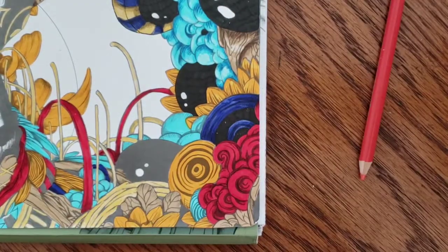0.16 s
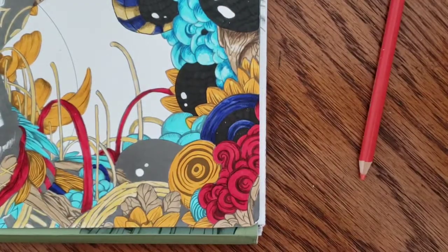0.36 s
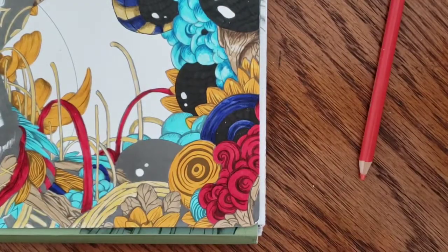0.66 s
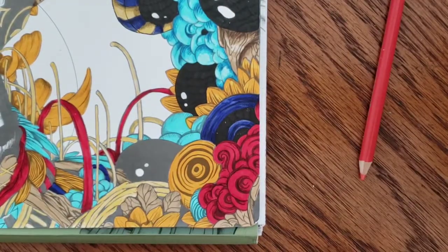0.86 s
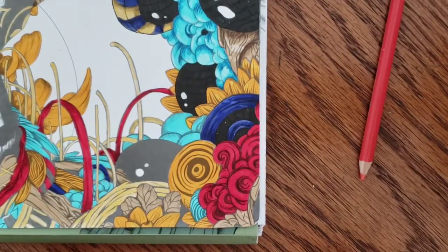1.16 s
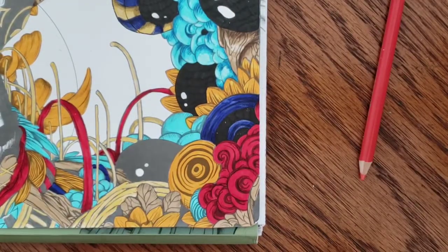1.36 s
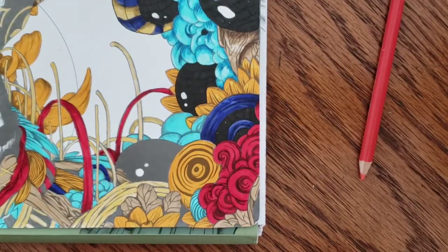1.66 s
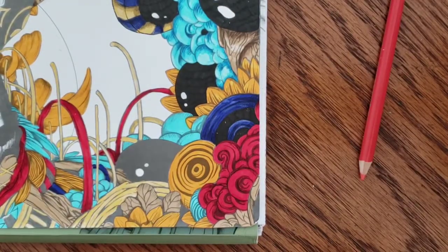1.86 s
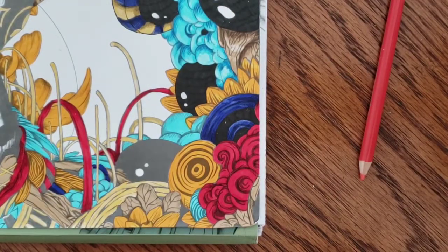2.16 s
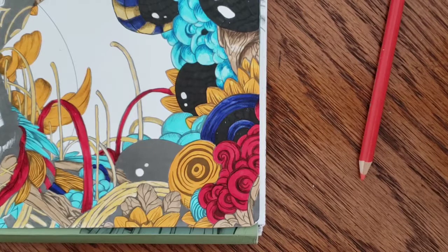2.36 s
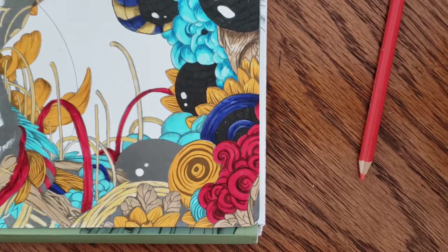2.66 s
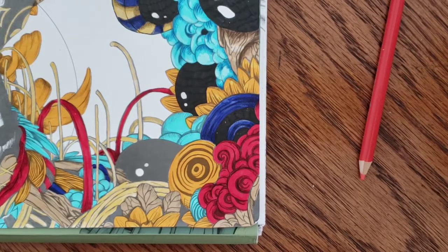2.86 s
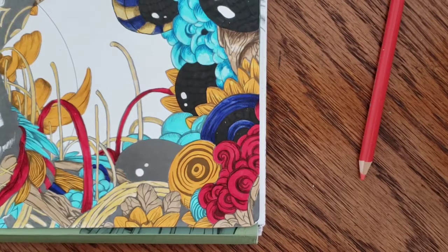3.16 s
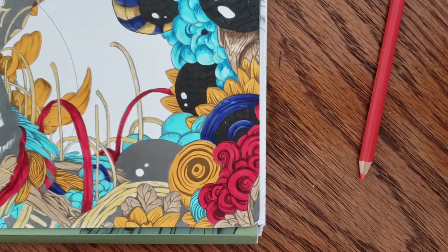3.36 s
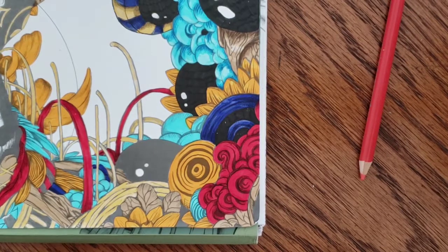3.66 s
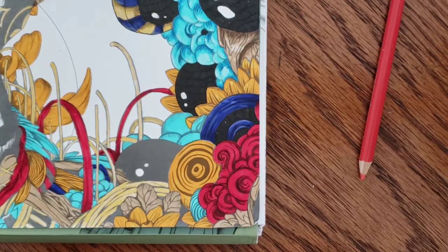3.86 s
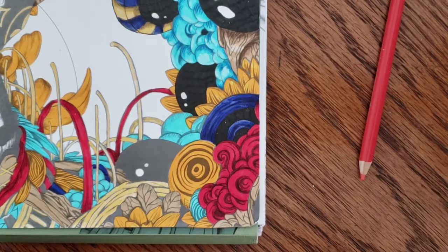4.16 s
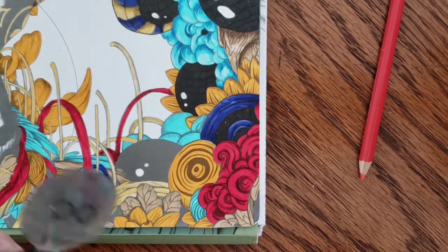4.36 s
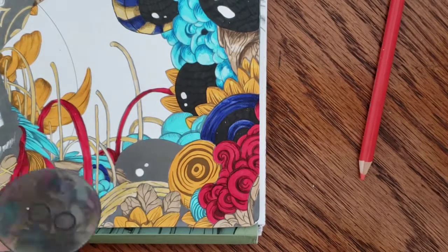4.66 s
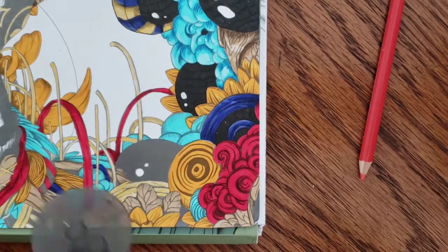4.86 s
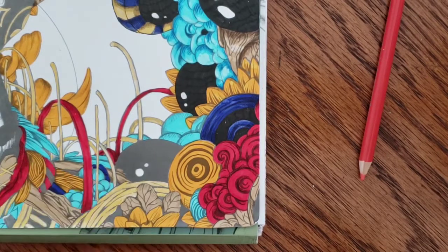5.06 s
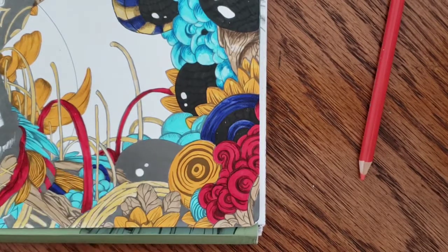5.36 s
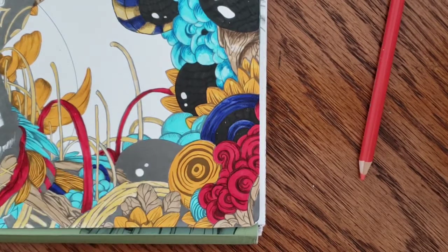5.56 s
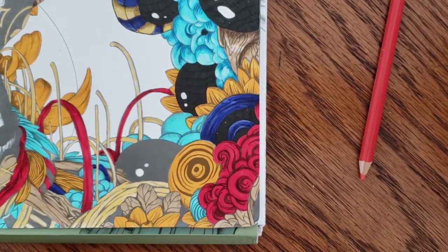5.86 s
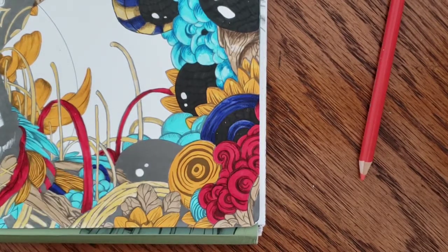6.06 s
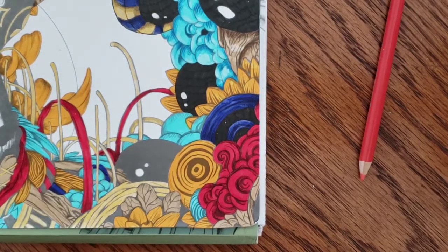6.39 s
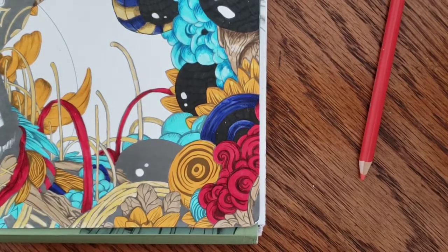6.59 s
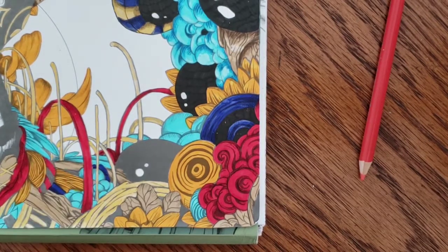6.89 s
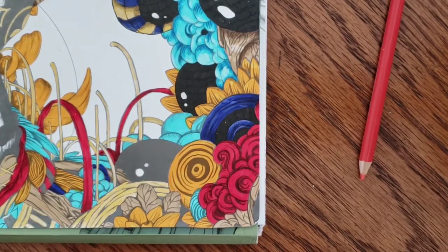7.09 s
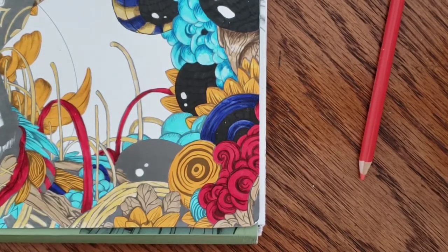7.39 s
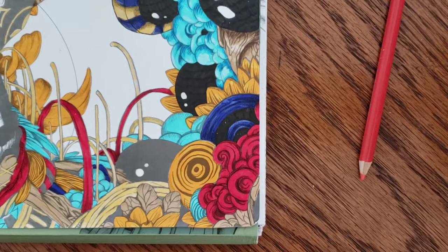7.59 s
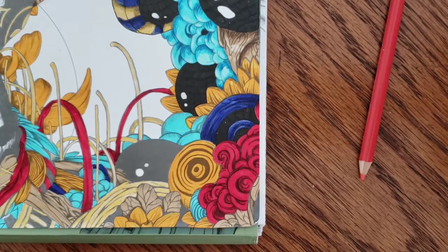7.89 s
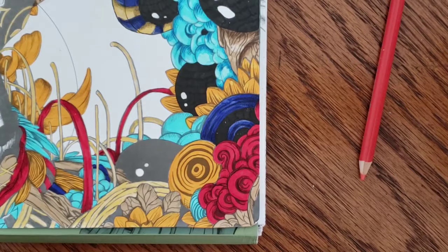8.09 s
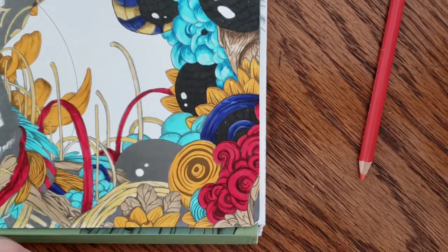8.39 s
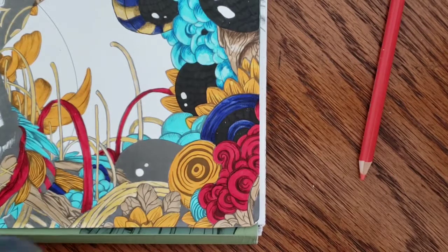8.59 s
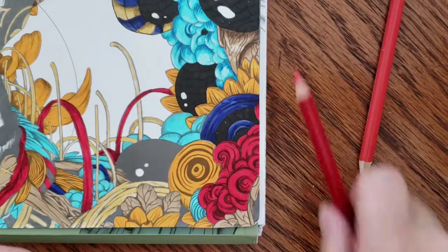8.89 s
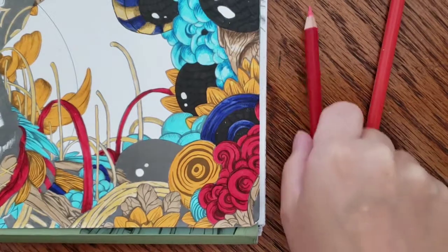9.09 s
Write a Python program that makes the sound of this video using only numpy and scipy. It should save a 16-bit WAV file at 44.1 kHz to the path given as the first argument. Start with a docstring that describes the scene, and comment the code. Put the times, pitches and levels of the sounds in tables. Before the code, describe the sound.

A pencil twists in a small hand sharpener with crisp, crackling wood scrapes in two bouts, between light knocks on a wooden desk.

```python
"""At a wooden desk in a small, quiet room, a pencil is twisted in a hand sharpener, in two bouts of twists.
It is a little right of the microphone. Tearing fibres and snapping flakes are short bursts of noise,
heard directly and through the ringing housing. In between, pencil and sharpener knock on the desk and slide.
A draught is low noise in gusts, different at the two microphone ports.
Behind it lie room air, a fan singing near 1 kHz and faint hums."""
import sys
import numpy as np
from scipy import signal
from scipy.fft import rfft, irfft, next_fast_len
from scipy.io import wavfile
from scipy.ndimage import map_coordinates

SR = 44100
rng = np.random.default_rng(int(sys.argv[2]) if len(sys.argv) > 2 else 0)


def generate_wav(signal):
    """Clip the signal to [-1, 1] and save it as 16-bit WAV at the path in sys.argv[1]."""
    frames = np.transpose(np.atleast_2d(signal))
    scaled = np.clip(frames, -1, 1) * 32767
    pcm = np.round(scaled).astype(np.int16)
    wavfile.write(sys.argv[1], SR, pcm)


N = 407484

# All levels in the tables are relative: the functions may raise or lower a whole layer.
# twists of the pencil, each with its own grip: start_s, length_s, hardest_push_place (0 to 1),
# level_db, left_minus_right_db, housing_ring_db, brightness_db
TWISTS = [(0.649, 0.088, 0.6, -65.5, 2, -27, 2.5), (0.999, 0.16, .8, -55, -1.5, -18, -1),
          (1.156, 0.097, 0.2, -46, -2, -18, -1.5), (1.548, 0.023, .5, -55, -1, -14, 2),
          (1.623, .13, 0.34, -48, -4.5, -11.5, -1.5), (2.089, 0.021, .2, -55.5, -2.5, -13, -1.5),
          (2.22, .17, 0.4, -49.5, -1, -13.5, -1.5), (2.714, 0.067, 0.04, -52.5, -1, -15, 0),
          (2.843, 0.17, 0.3, -52, 0.5, -18, 0), (3.066, 0.023, .2, -50.5, -2, -17, 2),
          (3.471, 0.14, 0.3, -58.5, -1, -18.5, -0.5), (3.742, 0.071, 0.5, -59, -4, -16, -3),
          (3.88, 0.13, 0, -66.5, -4, -13, -0.5), (5.594, 0.15, .6, -51, -1, -13, 3),
          (5.729, 0.13, .35, -44.5, 0, -10.5, -5), (6.261, 0.043, .4, -63.5, -1, -21.5, 3.5),
          (6.404, 0.17, 0.64, -52, -.5, -12.5, -3.5), (6.595, 0.13, 0, -54.5, -.5, -13, -3),
          (7.213, 0.12, 0.05, -65.5, 0.5, -8, -0.5), (7.423, 0.41, 0.81, -51, -.5, -15.5, -3),
          (7.903, 0.19, 0.88, -56, -1, -17.5, -4)]
# the pencil rubs in the cone between twists: start_s, length_s, level_db
RUBS = [(0.296, 0.48, -79.5), (.95, 0.46, -74.5), (1.602, 0.28, -71.5), (2.19, 0.23, -70),
        (3.4, 0.6, -75.5), (5.5, 0.45, -72), (6.225, 0.58, -72), (7.046, 1, -77), (8.228, 0.038, -72)]
# the larger flakes that snap off: start_s, level_db
FLAKE_SNAPS = [(.905, -64), (1.056, -43), (1.1293, -38), (1.1628, -35), (1.216, -41), (1.5414, -43),
               (1.6342, -48), (1.669, -33), (2.083, -40), (2.2223, -48), (2.257, -43), (2.7601, -41),
               (2.807, -41.5), (2.865, -38.5), (2.8956, -36.5), (2.9427, -41), (3.0026, -49), (3.0693, -39),
               (3.4895, -46), (3.5086, -38.5), (3.5748, -34.5), (5.7718, -31), (5.7944, -32), (5.8703, -42),
               (6.2523, -48.5), (6.2706, -45.5), (6.4093, -44), (6.5214, -34.5), (6.6688, -37.5),
               (6.6757, -37.5), (7.2744, -54), (7.344, -50), (7.3847, -47.5), (7.4647, -45), (7.538, -41.5),
               (7.836, -48), (8.0563, -33.5)]
# tone colour of tearing wood: frequency_hz, level_db
TEAR_COLOUR = [(300, -16.5), (1300, -4), (2000, -21), (3800, -20.5), (4600, -9), (6600, -1), (8300, 2),
               (10400, 3), (11800, 4), (13000, 4.5), (14500, 2)]
# resonances of the sharpener housing: pitch_hz, width_hz, level_db
HOUSING_MODES = [(504, 144, 2), (1450, 1150, -3.5), (2060, 230, 1.5), (2824, 194, 6), (3925, 300, 1.5)]
# pencil and sharpener knock on the desk: start_s, thud_pitch_hz, thud_db, clack_push_pitch_hz,
# clack_push_db, tick_db, left_minus_right_db (of clack and tick)
KNOCKS = [(.178, 530, -40.5, 1520, -15.5, -42, 3), (.298, 510, -54, 2880, -44, -55.5, 16),
          (0.538, 450, -56, 2000, -42, -50, 8), (.626, 400, -49, 1500, -56, -70, 0),
          (.764, 465, -53, 1500, -62, -67, 7), (3.985, 416, -41, 1500, -52, -70, 0),
          (4.004, 547, -36.5, 800, -29, -54, 0), (5.217, 543, -36.5, 1470, -12, -37.5, 2),
          (5.325, 490, -41, 1500, -27, -45.5, 5), (5.386, 450, -43, 2000, -45, -44, -12),
          (5.404, 430, -39.5, 1200, -25, -47.5, 4), (6.850, 442, -48, 1520, -48, -68, 8),
          (8.333, 580, -52, 2000, -37, -55, -3), (8.367, 436, -46, 3700, -38, -51, 8),
          (8.404, 807, -39, 2300, -14.5, -37.5, 11), (8.463, 564, -51.5, 2640, -39, -73, 0)]
# what the knocked pencil and sharpener ring with: pitch_hz, width_hz, level_db
CLACK_MODES = [(596, 210, 5), (1075, 220, 2), (1760, 1300, -7), (2230, 330, 1), (2910, 135, 11.5),
               (3580, 350, 11.5), (5650, 1570, 11.5)]
# tone colour of the first contact of a knock: frequency_hz, level_db
TICK_COLOUR = [(1000, -18), (4000, -17), (6400, -0.5), (8500, -1.5), (11500, -5), (14500, -4.5)]
# things dragged a little way over the desk: start_s, end_s, resonance_hz, level_db
SLIDES = [(.19, .3, 520, -59), (.53, .62, 450, -61), (.77, .98, 460, -65), (3.91, 3.98, 540, -64),
          (5.22, 5.32, 520, -51), (5.3, 5.45, 450, -52), (8.32, 8.4, 470, -59)]
# gusts of the draught: start_s, length_s, left_port_level_db, right_port_level_db
GUSTS = [(0, 0.23, -41.5, -62), (0.367, 0.093, -43.5, -67), (.5, 0.087, -52.5, -63),
         (1.438, 0.26, -38, -44), (1.808, 0.14, -36, -48), (2.03, 0.14, -47.5, -44),
         (2.283, 0.24, -48, -74), (2.525, 0.19, -36, -52), (2.811, 0.16, -33, -37),
         (3.05, 0.15, -36, -34.5), (3.58, 0.18, -46.5, -77), (3.82, 0.054, -43.5, -70),
         (4.089, 0.17, -46, -40.5), (4.344, 0.19, -42, -37), (4.74, 0.054, -46, -34),
         (4.875, 0.17, -52, -45), (5.091, 0.047, -39.5, -39.5), (5.27, 0.047, -49, -42),
         (5.382, 0.035, -36.5, -58), (5.512, .16, -51, -53.5), (6.333, 0.16, -43, -45),
         (6.487, 0.13, -35.5, -36), (6.686, 0.055, -50, -36.5), (6.789, 0.11, -59, -27),
         (6.939, 0.04, -35.5, -44), (7.087, .07, -50.5, -50.5), (7.437, .2, -48.5, -74),
         (7.698, 0.065, -41.5, -63), (8.086, 0.036, -51.5, -74), (8.666, 0.2, -44, -67),
         (9.018, 0.077, -38, -49.5), (9.14, 0.092, -50, -48)]
# tone colour of the draught's rumble: frequency_hz, level_db
RUMBLE_COLOUR = [(18, -30), (32, -8), (48, 2.5), (70, 0), (110, -7), (170, -21), (260, -30.5), (450, -51),
                 (1200, -74.5)]
# tone colour of room air and microphone hiss: frequency_hz, level_db
AIR_COLOUR = [(25, -6), (60, 2), (130, 2.5), (260, -2), (400, -6.5), (700, -13), (1400, -24), (2100, -21),
              (4000, -27), (8000, -32.5), (12000, -23), (14500, -26)]
# tone colour of the fan's singing band: frequency_hz, level_db
FAN_COLOUR = [(600, -63), (820, -19.5), (920, -9.5), (985, 2), (1045, -0.5), (1110, -3), (1190, -15),
              (1400, -26.5), (2000, -54)]
# faint hums that come and go: start_s, end_s, first_pitch_hz, last_pitch_hz, level_db
HUMS = [(4.55, 5.3, 120, 120, -58), (5.92, 6.6, 121, 119, -56), (3.6, 7.6, 552, 556, -81),
        (8.50, 8.65, 299, 281, -57), (8.62, 8.77, 289, 273, -59)]

BITE_S, LET_GO_S = 0.011, 0.018  # the blade bites in and comes free
BUILD_DB_PER_S, EASE_DB_PER_S = 37.5, 37  # pressure before and after the hardest push
RUB_FADE_S = 0.061
GUST_RISE_S, GUST_FALL_S = 0.022, 0.032
ROOM_T60_S, ROOM_TREBLE_T60_S = 0.23, 0.27  # time for the echoes to fall by 60 dB
TOP_HZ = 14620  # where the recorder cuts the treble

T = np.arange(N) / SR  # time in seconds
SIZE = next_fast_len(N + SR // 2, True)  # padded length, so that filtering does not wrap around
FREQS = np.arange(SIZE // 2 + 1) * SR / SIZE


def sharpener(cut_db=2.5, snap_db=-3, ring_level_db=-9, housing_pan_db=11):
    """Each twist tears a shaving off the pencil; the cracks sound directly and ring the housing."""
    texture = fibres(per_s=450, spread_db=4.5, decay_s=0.001, chatter_hz=90, chatter_db=1.3, rub_db=-3.5)
    tearing = undb(cut_db) * pressure() * texture
    snaps = undb(snap_db) * bursts(*np.transpose(FLAKE_SNAPS), decay_s=0.0052)
    cut = hands(np.hypot(tearing, snaps), echo_db=-5, apart_db=-5)
    pan_db, ring_db, bright_db = grip()

    tear = through(cut, contour(TEAR_COLOUR))
    # the highest treble is easily shaded by the fingers, most on the way to the left port
    top = through(tear, 1 / (1 + (10000 / (FREQS + 1)) ** 12))
    tear = tear + (undb(bright_db) * sides(pan_db=-4.0) - 1) * top
    tear = room(tear, lag_ms=0.16, early_db=-20, early_s=0.002, tail_db=-11)

    # the housing opens to the left
    ring = through(cut * undb(ring_db), resonances(HOUSING_MODES))
    ring = room(ring, lag_ms=0.069, early_db=-21.0, early_s=0.0013, tail_db=-3.0)
    return tear * sides(pan_db) + undb(ring_level_db) * ring * sides(housing_pan_db)


def pressure():
    """In each twist the push builds and eases again; in between the pencil only rubs."""
    effort = np.zeros(N)
    for start, length, db in RUBS:
        effort += undb(db) * hold(start, length, RUB_FADE_S, RUB_FADE_S)
    for start, length, place, db, *_ in TWISTS:
        past_s = T - (start + place * length)  # time since the hardest push
        slack_db = np.maximum(-BUILD_DB_PER_S * past_s, EASE_DB_PER_S * past_s)
        twist = undb(db - slack_db) * hold(start, length, BITE_S, LET_GO_S)
        effort = np.maximum(effort, twist)
    return effort


def grip():
    """Balance, housing ring and brightness: the hands shift from one twist to the next."""
    start, length, place, _, *columns = np.transpose(TWISTS)
    return [np.interp(T, start + place * length, column) for column in columns]


def fibres(per_s, spread_db, decay_s, chatter_hz, chatter_db, rub_db):
    """Envelope of fibres breaking at random; the blade catches and frees itself over a smooth rub."""
    chance, size = rng.random(N), rng.standard_normal(N)
    breaks = (chance < per_s / SR) * undb(spread_db * np.clip(size, -2, 2)) ** 2
    # each break adds power that dies away
    power = signal.lfilter([1], [1, -np.exp(-2 / (decay_s * SR))], breaks)
    cracks_over_rub = np.sqrt(power / power.mean() + undb(rub_db) ** 2)
    return unit(cracks_over_rub * undb(chatter_db * walk(chatter_hz)))


def hands(envelope, echo_db, apart_db, count=2):
    """Cracks reach each port partly alike; moving fingers add short echoes that shift the colour."""
    cracks = envelope * rng.standard_normal(N)

    def echo():
        """One copy of the cracks with a slowly wandering delay, upright or inverted."""
        lag_s = 0.0006 * np.exp(0.35 * walk(2))
        return rng.choice([-1, 1]) * map_coordinates(cracks, [(T - lag_s) * SR], order=3)

    scattered = np.array([sum(echo() for _ in range(count)) for _ in range(2)]) / np.sqrt(count)
    apart = envelope * rng.standard_normal((2, N))
    heard = cracks + undb(echo_db) * scattered + undb(apart_db) * apart
    return heard / np.sqrt(1 + undb(echo_db) ** 2 + undb(apart_db) ** 2)


def knocks(thud_s=0.0054, clack_s=0.00052, clack_db=-16, tick_db=-3):
    """Each blow gives a damped thud of the desk, a hollow clack and a contact tick."""
    starts, *_, ticks_db, pans_db = np.transpose(KNOCKS)
    thuds, pushes, t = np.zeros(N), np.zeros(N), T[:4096]
    for start, thud_hz, thud_db, push_hz, push_db, *_ in KNOCKS:
        thud = np.sin(2 * np.pi * thud_hz * t) * np.exp(-t / thud_s)
        add(thuds, start, undb(thud_db) * thud)
        # a harder contact gives a quicker push and wakes higher modes
        push = np.sin(2 * np.pi * push_hz * t) * np.exp(-t / clack_s)
        add(pushes, start, undb(push_db) * push)
    clacks = undb(clack_db) * through(pushes, resonances(CLACK_MODES))
    tick_noise = bursts(starts, ticks_db, decay_s=0.00065) * rng.standard_normal(N)
    ticks = undb(tick_db) * through(tick_noise, contour(TICK_COLOUR))
    bright = room(clacks + ticks, lag_ms=0, early_db=-2.5, early_s=0.0035, tail_db=4)
    bright = bright * sides(np.interp(T, starts, pans_db))
    return bright + room(thuds, lag_ms=0, early_db=-24, early_s=0.0034, tail_db=-2.5)


def slides(width_hz=260):
    """Stick-slip of a dragged object sets the desk top rattling in one low resonance."""
    rattle = np.zeros(N)
    judder = undb(3 * walk(110)) * rng.standard_normal(N)
    for start, end, hz, db in SLIDES:
        push = np.sin(np.pi * np.clip((T - start) / (end - start), 0, 1))
        # squaring the resonance narrows it
        tone = unit(through(judder, resonances([(hz, width_hz, 0)]) ** 2))
        rattle += undb(db) * push * tone
    return room(rattle, lag_ms=0, early_db=-4, early_s=0.0028, tail_db=-22)


def draught(eddy_hz=22, eddy_db=3):
    """Gusts reach the two ports unequally, and eddies shake each port on its own."""
    power = np.zeros((2, N))
    for start, length, left_db, right_db in GUSTS:
        gust = undb([[left_db], [right_db]]) * hold(start, length, GUST_RISE_S, GUST_FALL_S)
        power += gust ** 2
    eddies = np.array([unit(rng.standard_normal(N) * undb(eddy_db * walk(eddy_hz))) for _ in range(2)])
    return through(eddies * np.sqrt(power), contour(RUMBLE_COLOUR))


def background(air_db=-66, fan_db=-63.5, whistle_db=-66, waver_db=1, unsteady_db=2):
    """Room air, the fan's wavering band and thin tone, and faint hums that swell and fade."""
    air = undb(air_db) * steady(AIR_COLOUR, alike_hz=626)
    fan = undb(fan_db + waver_db * walk(9)) * steady(FAN_COLOUR, alike_hz=510)
    fan = fan + undb(whistle_db) * whistle()
    hums = np.zeros(N)
    for start, end, first_hz, last_hz, db in HUMS:
        progress = np.clip((T - start) / (end - start), 0, 1)
        glide_hz = first_hz + (last_hz - first_hz) * progress
        hz = glide_hz * (1 + 0.0134 * walk(50))  # the pitch trembles
        swell = undb(db + unsteady_db * walk(30)) * np.sin(np.pi * progress)
        hums += swell * np.sin(2 * np.pi * np.cumsum(hz) / SR)
    return air + fan + np.sqrt(2) * hums


def whistle(hz=1028, wander_hz=24, flutter_hz=17, flicker_db=3.5, lag_rad=1.4):
    """A thin tone that wanders about inside the fan's band, later in phase at the left port."""
    pitch_hz = hz + wander_hz * walk(6) + flutter_hz * walk(90)
    phase = 2 * np.pi * np.cumsum(pitch_hz) / SR
    return np.array([unit(undb(flicker_db * walk(25)) * np.sin(phase - lag)) for lag in (lag_rad, 0)])


def steady(points, alike_hz):
    """Coloured noise, the same at both ports in the bass and unrelated well above alike_hz."""
    shared, own = rng.standard_normal(N), rng.standard_normal((2, N))
    likeness, colour = 1 / (1 + (FREQS / alike_hz) ** 2), contour(points)
    return through(shared, colour * np.sqrt(likeness)) + through(own, colour * np.sqrt(1 - likeness))


def room(x, lag_ms, early_db, early_s, tail_db):
    """Direct sound reaches the left port late by lag_ms; desk and hands scatter it, then the walls ring on."""
    t = T[:SR // 2]
    early, low, high = rng.standard_normal((3, 2, len(t)))
    split = signal.butter(1, 4000, fs=SR)
    low, high = signal.lfilter(*split, low), high - signal.lfilter(*split, high)
    tail = low * undb(-60 * t / ROOM_T60_S) + high * undb(-60 * t / ROOM_TREBLE_T60_S)
    tail = tail * np.minimum(t / 0.008, 1)  # the walls answer gradually
    echoes = undb(early_db) * unit(early * np.exp(-t / early_s)) + undb(tail_db) * unit(tail)
    echoes = echoes / np.sqrt(len(t))
    direct = np.exp(-2j * np.pi * FREQS * np.array([[lag_ms], [0]]) / 1000)
    return through(x, direct + rfft(echoes, SIZE))


def hold(start, length, attack_s, release_s):
    """Envelope that swells up to its start, holds for its length, and dies away."""
    before, after = np.maximum(start - T, 0), np.maximum(T - start - length, 0)
    return np.exp(-np.minimum(before / attack_s + after / release_s, 20))


def bursts(times, levels_db, decay_s):
    """Envelope of brief cracks that start at once and die away."""
    track, t = np.zeros(N), T[:2048]
    for s, db in zip(times, levels_db):
        add(track, s, undb(db) * np.exp(-t / decay_s))
    return track


def contour(points):
    """Causal frequency response through (frequency_hz, level_db) points, with unit power gain."""
    hz, db = np.transpose(points)
    gain = undb(np.interp(np.log(FREQS + 1), np.log(hz), db))
    # the phase that lets the filter answer as promptly as possible
    cepstrum = irfft(np.log(gain), SIZE)
    phase = 2 * rfft(cepstrum[:SIZE // 2], SIZE).imag
    return unit(gain) * np.exp(1j * phase)


def resonances(modes):
    """Frequency response of damped modes of alternating sign, with unit power gain."""
    response = np.zeros(len(FREQS), complex)
    for k, (hz, width, db) in enumerate(modes):
        damping = 1j * FREQS * width
        response += (-1) ** k * undb(db) * damping / (hz ** 2 - FREQS ** 2 + damping)
    return response / np.sqrt(np.mean(np.abs(response) ** 2))


def through(x, response):
    """Filter a signal by a frequency response."""
    return irfft(rfft(x, SIZE) * response, SIZE)[..., :N]


def walk(rate):
    """Random wander with a spread of 1: straight lines between random points, rate points a second."""
    knots = rng.standard_normal(8192)
    return unit(np.interp(T * rate, np.arange(len(knots)), knots))


def add(track, s, sound):
    """Mix a short sound into a track at time s in seconds."""
    start = int(s * SR)
    track[start:start + len(sound)] += sound[:N - start]


def sides(pan_db):
    """Left and right gains for a left-minus-right level difference."""
    return undb(np.array([pan_db, -pan_db]) / 2).reshape(2, -1)


def undb(db):
    """Decibels to gain."""
    return 10 ** (np.asarray(db) / 20)


def unit(x):
    """Scale to an rms (average strength) of 1."""
    return x / np.sqrt(np.mean(x ** 2))


def scene():
    """Everything heard at the desk."""
    return sharpener() + knocks() + slides() + draught() + background()


def record(dry):
    """The recorder cuts the treble steeply above TOP_HZ."""
    low_pass = signal.ellip(10, 0.2, 70, TOP_HZ, fs=SR, output="sos")
    return signal.sosfilt(low_pass, dry)


dry = scene()
out = record(dry)
generate_wav(out)
```